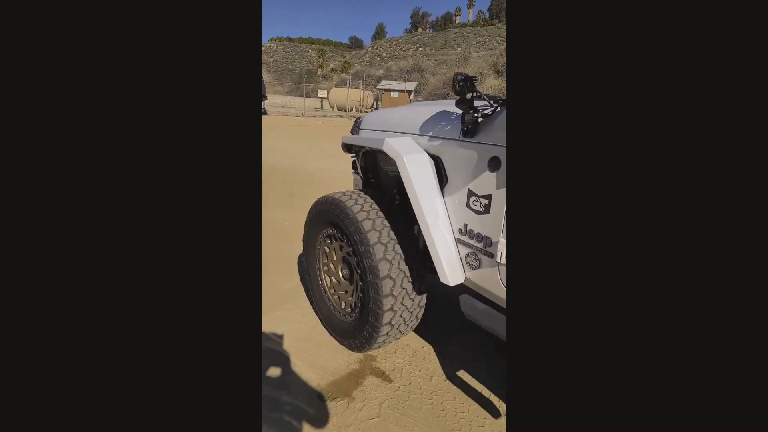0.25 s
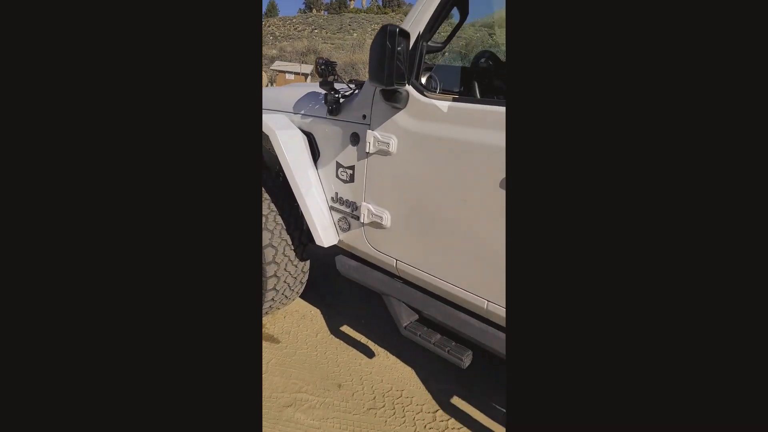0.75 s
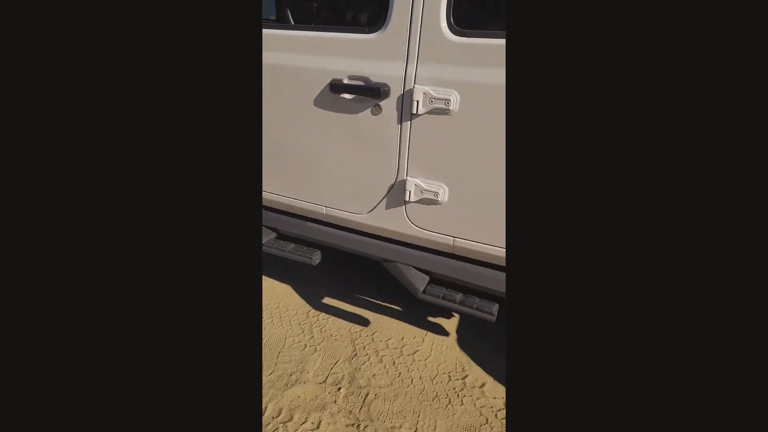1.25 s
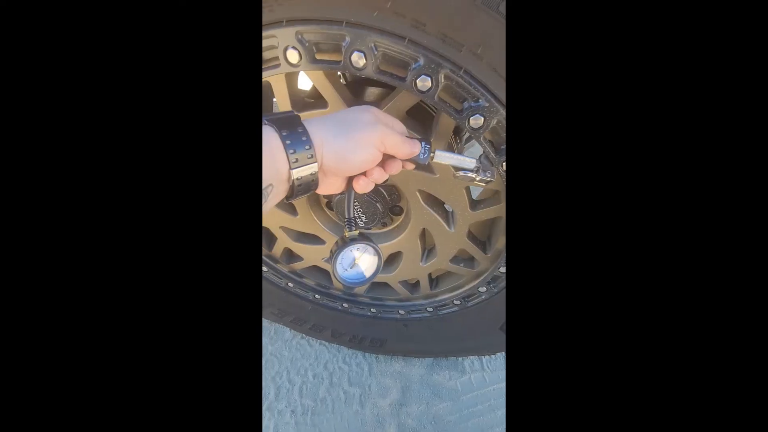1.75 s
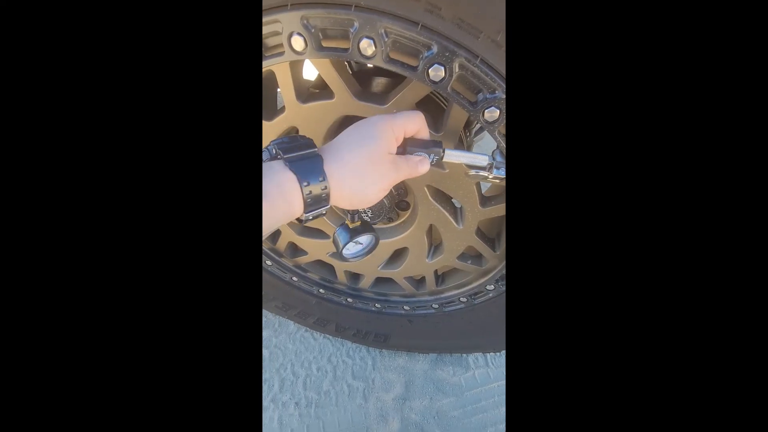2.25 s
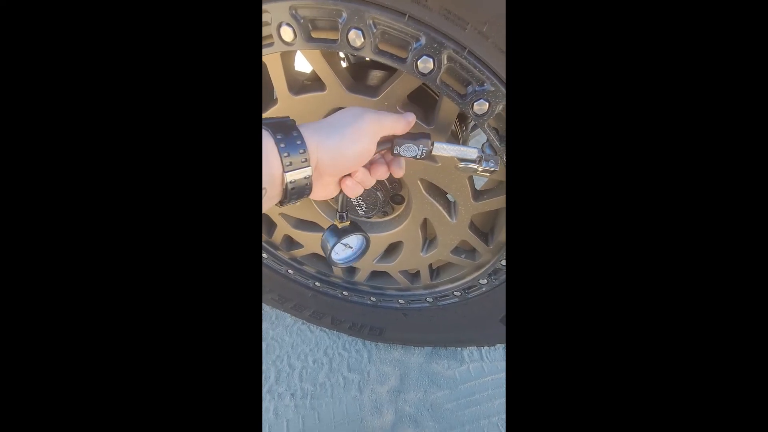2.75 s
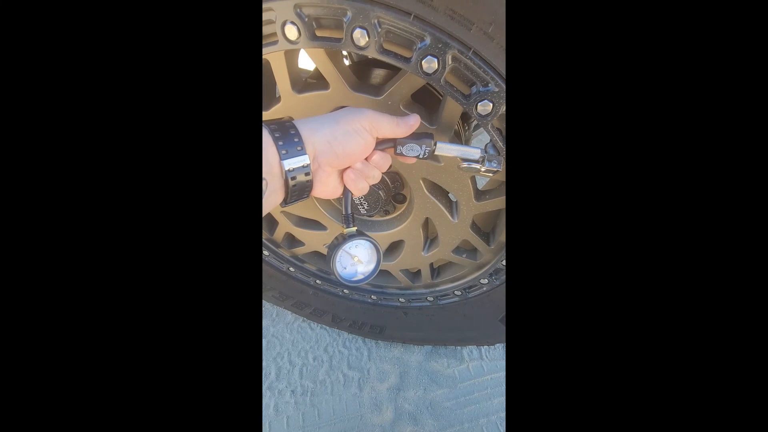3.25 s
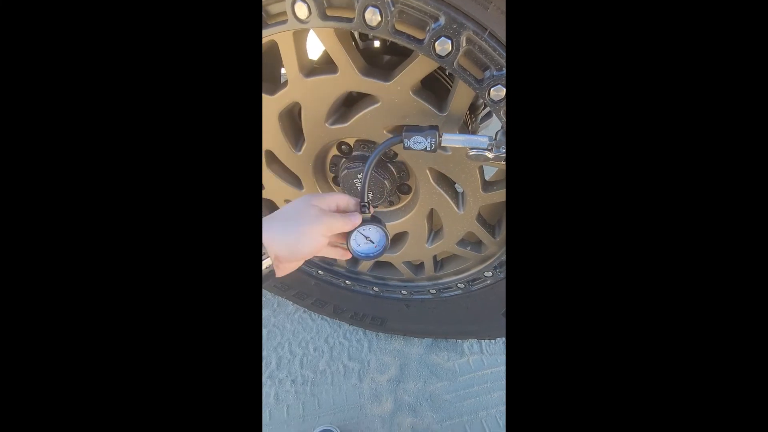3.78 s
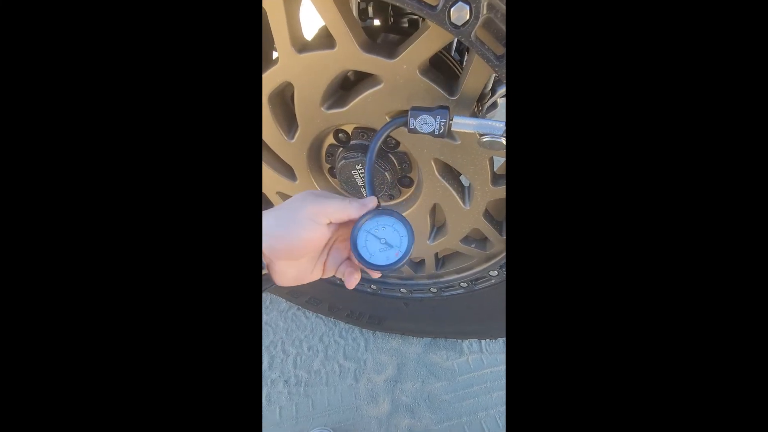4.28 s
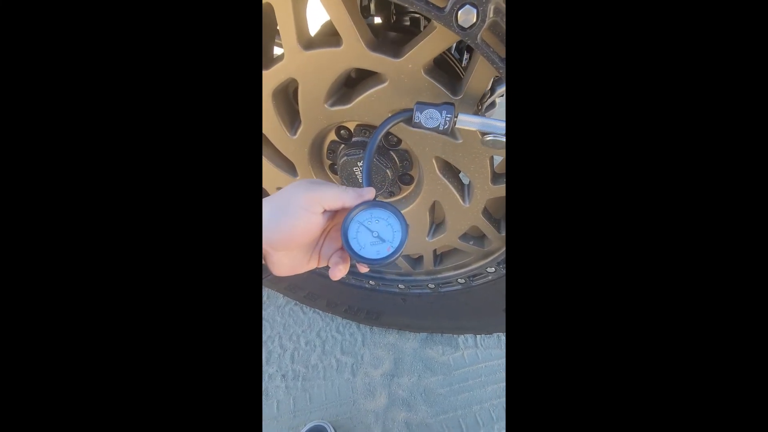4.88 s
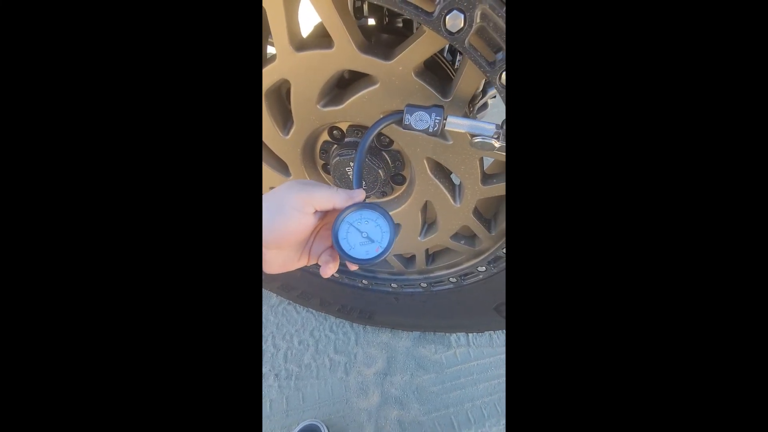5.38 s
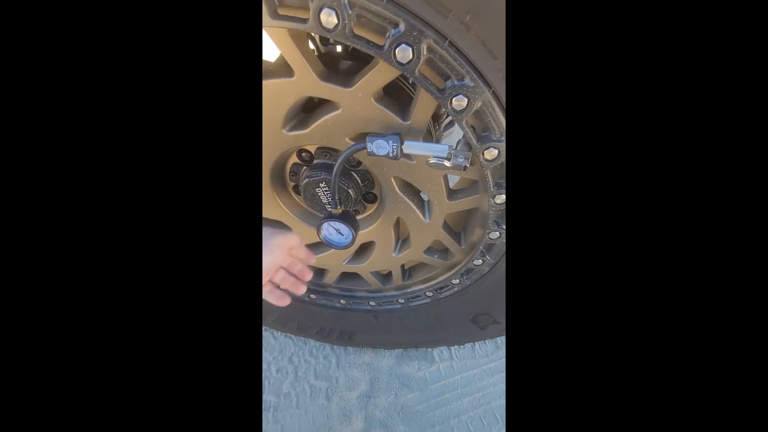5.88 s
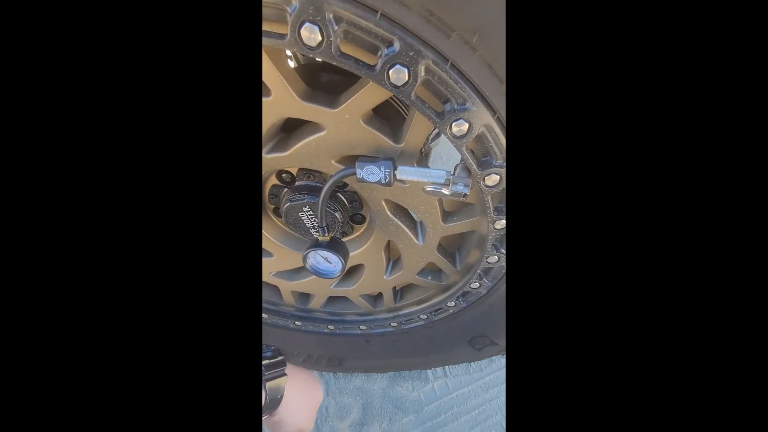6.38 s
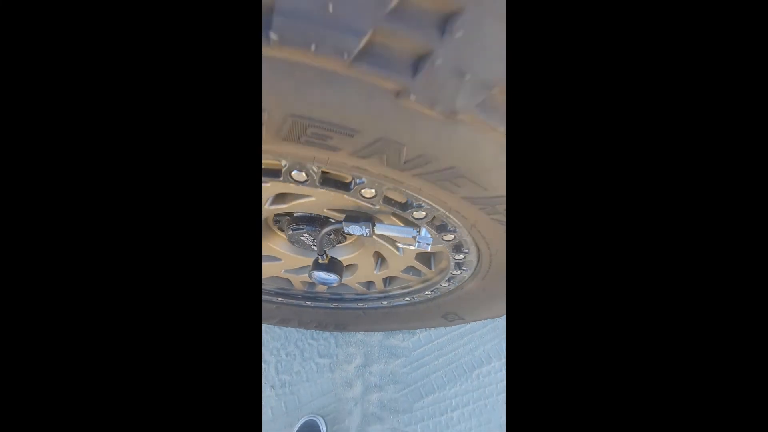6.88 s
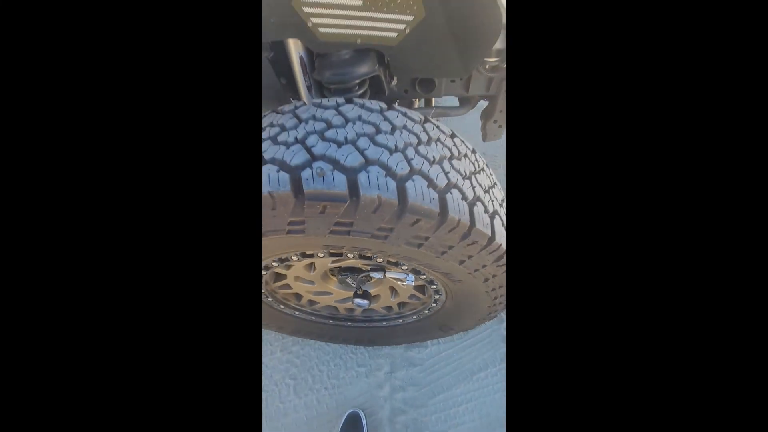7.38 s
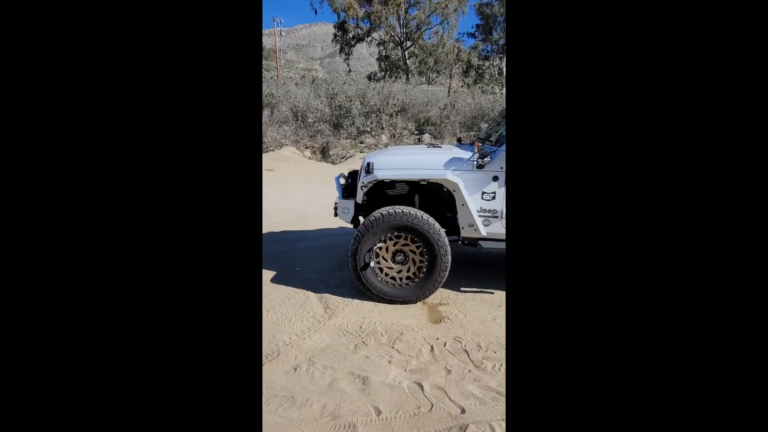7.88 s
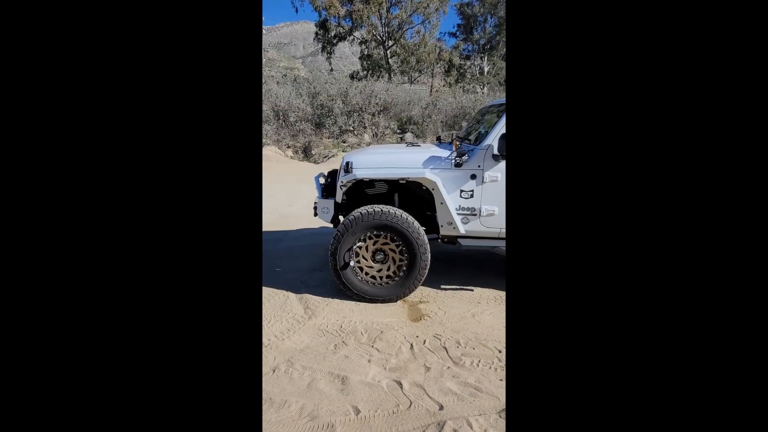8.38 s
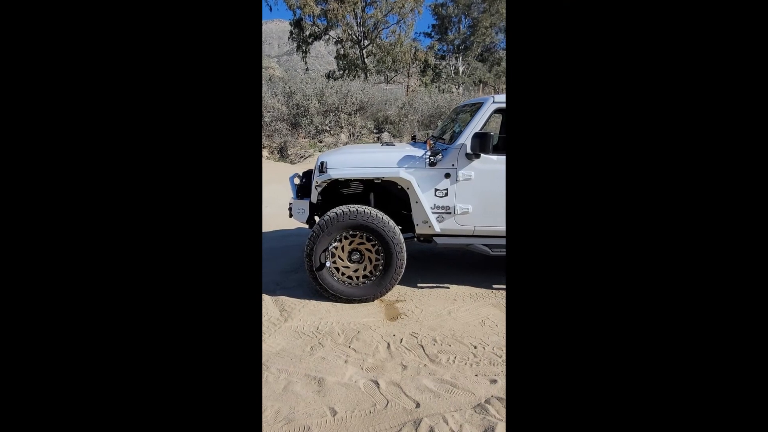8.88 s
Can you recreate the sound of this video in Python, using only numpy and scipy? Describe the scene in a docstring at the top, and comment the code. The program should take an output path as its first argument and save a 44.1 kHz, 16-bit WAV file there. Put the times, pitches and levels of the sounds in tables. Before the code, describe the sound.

A low, lumpy engine idle opens the scene, with a distant tyre hissing softly. The sound cuts to right beside the valve: a faint metallic clink, a quickly growing leak, then a strong rush of air that holds for several seconds over gusts of wind on the microphones. Finally the same hiss is heard from farther away, steady and soft, with light wind rumble. It is all outdoors, in head-like stereo.

```python
"""Air hisses from the valve of a large tyre outdoors: the escaping jet swirls, and that makes the noise.
Two microphones, one each side of a head, hear it from three spots with short gaps between them.
First from afar, beside an idling two-cylinder engine whose firings ring its exhaust pipe. Then close up,
as a hand opens the valve, a tool clinks and the listener steps back. Last from across the yard.
At the last two spots, wind buffets each microphone on its own."""
import sys
import numpy as np
from scipy import signal
from scipy.io import wavfile
from scipy.ndimage import uniform_filter1d

SR = 44100
rng = np.random.default_rng(int(sys.argv[2]) if len(sys.argv) > 2 else 0)


def put_to_file(sound):
    """Save the sound as 16-bit audio at rate SR, in the file named by the first command-line argument."""
    columns = np.atleast_2d(sound).T  # one column per channel
    safe = np.clip(columns, -1, 1)
    whole_steps = np.round(safe * 32767)
    wavfile.write(sys.argv[1], SR, whole_steps.astype(np.int16))


N = 403074


def amp(db):
    """Gain of a level in dB."""
    return 10 ** (np.asarray(db) / 20)


def evened(x):
    """Scales to rms 1."""
    return x / np.sqrt(np.mean(x ** 2) + 1e-20)


def read(points, hz):
    """Every column of a spectrum table, on a log-frequency axis."""
    f, *columns = np.transpose(points)
    return np.array([np.interp(np.log(hz + 1), np.log(f + 1), c) for c in columns])


def add(mix, s, sound):
    """Mixes a sound in at a time."""
    part = mix[:, max(round(s * SR), 0):][:, :sound.shape[1]]
    part += sound[:, :part.shape[1]]


def blotches(frames, bins, across, along):
    """Random field of rms 1, smooth over some bins and some frames."""
    field = rng.standard_normal((2, bins, frames))
    return evened(uniform_filter1d(uniform_filter1d(field, across, 1), along, 2))


def resonate(x, hz, width_hz):
    """A fixed resonance of gain 1."""
    return signal.lfilter(*signal.iirpeak(hz, hz / width_hz, SR), x)


# the idle speed, wandering a little: (time [s], speed [cycles a second])
IDLE_SPEED = [(0, 9.29), (.17, 10.6), (.56, 10.41), (.76, 11), (.86, 10.37), (1.24, 9.86), (1.4, 10.39),
              (1.6, 9.86)]

def firing_times(first_s=0.0378):
    """The first cylinder fires once in every engine cycle."""
    t = np.arange(first_s, IDLE_SPEED[-1][0], 1 / SR)
    cycles = np.cumsum(np.interp(t, *np.transpose(IDLE_SPEED))) / SR
    return np.interp(np.arange(16), cycles, t)


# notes of the exhaust pipe and bodywork: (pitch [Hz], relative level [dB], time to fade by 60 dB [s])
EXHAUST_NOTES = [(54.8, -12.5, 0.21), (78.3, -9.5, 0.14), (109.3, -19, 0.32), (238, -47, 0.051),
                 (388.4, -18, 0.23)]

def engine(lead_s=.1, second_share=.37, rasp_share=-0.07):
    """Two uneven firings a cycle ring the exhaust, along with gas roar, a whine, a rasp and clatter."""
    n = round(1.7 * SR)
    first = firing_times() + lead_s  # start early, so the cycle before is still ringing
    cycle_s = np.diff(first, append=2 * first[-1] - first[-2])
    first, cycle_s = np.r_[first[0] - cycle_s[0], first], np.r_[cycle_s[0], cycle_s]
    second = first + second_share * cycle_s
    chance = rng.standard_normal((len(first), 2))
    kicks = np.zeros(n)
    kicks[(first * SR).astype(int)] = amp(0.29 * chance[:, 0])
    kicks[(second * SR).astype(int)] = amp(-2.5 + 0.81 * chance[:, 1])
    blow = signal.windows.hann(round(0.0036 * SR))
    pulses = -signal.oaconvolve(kicks, blow / blow.sum(), "same")  # minus: suction comes first
    t = np.arange(SR // 2) / SR
    pipe = sum(amp(db - 60 * t / t60) * np.cos(2 * np.pi * hz * t) for hz, db, t60 in EXHAUST_NOTES)
    chug = signal.oaconvolve(pulses, pipe)[:n]
    gas = rng.standard_normal((2, n)) * 0.4 + rng.standard_normal(n)

    def gas_band(hz, width_hz):
        """The part of the gas noise near one pitch."""
        return evened(resonate(resonate(gas, hz, width_hz), hz, width_hz))

    roar = sum(amp(db) * gas_band(hz, 10 / t60) for hz, db, t60 in EXHAUST_NOTES)
    whine = gas_band(326.4, width_hz=14)
    cycles = np.interp(np.arange(n) / SR, first, np.arange(len(first)))
    swell = 1 + np.cos(2 * np.pi * (cycles - rasp_share))  # peaks just before the first cylinder fires
    rasp = gas_band(1600, width_hz=1000) * swell
    sound = chug + amp(-49.5) * rasp + amp(-18.5) * roar + amp([[-37], [-33]]) * whine
    sound += amp([[2], [6]]) * clatter(n, lead_s)
    return sound[:, round(lead_s * SR):]


# how the hiss at the left ear also reaches the right, one list a spot: (delay [ms], share)
EAR_PATHS = [
    [(.13, .3), (.71, .22)],
    [(-.02, -.16), (.06, -.2), (.58, .19), (.77, .13), (1.31, -.17)],
    [(-1.1, .12), (-.7, -.12), (-.01, .23), (.15, .12), (.63, .28), (1.32, .1)],
]

def hiss(moves, tone, spot, ripple_db, patchy_db, tone_change=None):
    """Swirling air makes noise; echoes off spokes and ground make some pitches louder than others."""
    s, level_db, treble_db, pan_db = np.transpose(moves)
    n = round((s[-1] - s[0]) * SR)
    frames, hz = n // 128 + 5, np.fft.rfftfreq(512, 1 / SR)
    t = s[0] + np.arange(frames) * 128 / SR
    treble_octaves = np.log2(np.maximum(hz / 3500, 1))[:, None]
    db = read(tone, hz)[:, :, None] + np.interp(t, s, treble_db) * treble_octaves
    db += 36 * np.log2(np.clip(hz / 450, .01, 1))[:, None]  # hardly any bass
    if tone_change:
        db += tone_change(t, hz)
    db += ripple_db * blotches(frames, 257, across=2, along=500)
    db += patchy_db * blotches(frames, 257, across=16, along=70)
    db += 2.47 * blotches(frames, 257, across=2, along=10)  # fine grain of the swirls
    a, b, c, d = rng.standard_normal((4, 257, frames))
    left, unrelated = a + 1j * b, c + 1j * d
    shared = sum(share * np.exp(-2j * np.pi * hz * ms / 1000) for ms, share in EAR_PATHS[spot])[:, None]
    right = shared * left + np.sqrt(np.clip(1 - abs(shared) ** 2, 0, 1)) * unrelated
    spectrum = np.array([left, right]) * amp(db)
    power = (abs(spectrum) ** 2).mean((0, 1))
    spectrum /= np.sqrt(uniform_filter1d(power, 60))  # changes of tone leave the level alone
    noise = evened(signal.istft(spectrum, nperseg=512, noverlap=384)[1][:, :n])
    t = s[0] + np.arange(n) / SR
    return s[0], noise * amp(np.interp(t, s, level_db) + np.outer([.5, -.5], np.interp(t, s, pan_db)))


# tone of the hiss beside the engine: (pitch [Hz], left [dB], right [dB])
FAR_TONE = [(554, -8, 3), (1030, -11.5, -12), (1780, -9.5, -3.5), (2400, -17, -13.5), (4270, -19.5, -16.5),
            (6050, -16.5, -9.5), (7740, -18.5, -20.5), (9100, -20, -10.5), (13500, -11, -9),
            (15700, -17, -17)]
# how it moves: (time [s], level [dB], treble tilt [dB an octave], left over right [dB])
FAR_MOVES = [(0, -38, -3, 5.5), (1.6, -35.5, -1.5, 3.5)]

def far_hiss():
    """The distant tyre's hiss blends with the whirr of the engine."""
    return hiss(FAR_MOVES, FAR_TONE, spot=0, ripple_db=1.2, patchy_db=1.6)


# ticks of the engine's valves, mostly in pairs: (time [s], relative level [dB])
VALVE_TICKS = [(0.1141, -32), (0.1356, -32), (0.3067, -30), (0.3316, -32), (0.403, -30), (0.4254, -32),
               (0.4963, -32), (0.5187, -34), (0.614, -31), (0.8824, -32), (0.9737, -32)]

def clatter(n, lead_s, snap_s=0.0047, rattle_s=0.022):
    """The engine's valve gear taps: each tick is a bright snap, then a softer rattle."""
    at, tick_db = np.transpose(VALVE_TICKS)
    taps = np.zeros(n)
    taps[((at + lead_s) * SR).astype(int)] = amp(tick_db)
    t = np.arange(2000) / SR
    fade = np.exp(-t / snap_s) + 0.46 * np.exp(-t / rattle_s)
    ticks = signal.oaconvolve(taps, fade)[:n] * rng.standard_normal((2, n))
    return sum(resonate(resonate(ticks, hz, 1200), hz, 1200) for hz in (5300, 6900))


# wind strength, one list for each of the last two spots: (time [s], left [dB], right [dB])
GUSTS = [
    [(1.58, -29, -30), (2.12, -35, -33.5), (2.32, -24, -18.5), (2.47, -31.5, -25.5), (2.73, -17.5, -13.5),
     (2.9, -26.5, -20), (3.18, -17.5, -20), (3.3, -33, -22), (3.83, -27, -20), (4.0, -12.5, -16.5),
     (4.15, -25, -25.5), (4.35, -18.5, -21.5), (4.85, -25.5, -23.5), (5.1, -21.5, -24), (5.5, -33, -25),
     (5.75, -24, -21.5), (6.1, -29.5, -28.5), (6.45, -26, -20.5), (7.0, -33, -23.5), (7.3, -28, -21),
     (7.76, -28, -20)],
    [(7.79, -38.5, -39), (8.1, -37.5, -39), (8.72, -41, -41.5), (8.82, -29.5, -36), (9.0, -38, -42),
     (9.14, -34, -38)],
]
# the wind's deep tone: (pitch [Hz], relative level [dB])
WIND_TONE = [(20, -31), (38, -4.5), (55, 5.5), (80, -0.5), (170, -11), (300, -21), (600, -33), (1300, -51),
             (6000, -96)]

def wind(gusts, upper_cut_s=(1.92, 2.2), upper_cut_db=-18):
    """Wind pushes on each microphone separately and makes a lumpy rumble."""
    s, *level_db = np.transpose(gusts)
    n = round((s[-1] - s[0]) * SR)
    frames, hz = n // 256 + 9, np.fft.rfftfreq(2048, 1 / SR)
    a, b = rng.standard_normal((2, 2, 1025, frames))
    lumps_db = 3.76 * blotches(frames, 1025, across=12, along=6) * np.clip(hz / 120, .3, 1.5)[:, None]
    t = s[0] + np.arange(frames) * 256 / SR
    # the rumble is briefly filtered above about 200 Hz as the loud hiss starts
    upper = np.clip(hz / 185 - 1, 0, .2) * 5
    cut = np.clip(np.minimum(t - upper_cut_s[0], upper_cut_s[1] - t) / .02, 0, 1)
    lumps_db += upper_cut_db * np.outer(upper, cut)
    spectrum = (a + 1j * b) * amp(read(WIND_TONE, hz)[0][:, None] + lumps_db)
    rumble = evened(signal.istft(spectrum, nperseg=2048, noverlap=1792)[1][:, :n])
    t = s[0] + np.arange(n) / SR
    return s[0], rumble * amp([np.interp(t, s, db) for db in level_db])


# tone of the hiss right by the valve: (pitch [Hz], left [dB], right [dB])
CLOSE_TONE = [(800, -6.5, -6), (1050, -17, -22), (1280, -9, -14), (1720, -7, -11), (1980, -9, -18),
              (2600, -6, -1), (2950, -7, -9), (3350, 0, -2), (3800, -4, -6), (4450, -2, 0), (7150, -2, -3),
              (8000, -7, -8), (9750, -9, -10), (11900, -2, -3), (12900, -1, -5), (14500, -1, -9),
              (15700, -6, -15)]
# the leak grows: (time [s], level [dB], treble tilt [dB an octave], left over right [dB])
LEAK_MOVES = [(1.62, -61, -17, -2), (1.72, -66, -16, 1), (1.79, -60.5, -6, 0), (1.845, -32, -1, 3),
              (1.912, -20.5, 1, -3)]

def first_leak():
    """The valve starts to open: a faint, dull leak turns loud and bright."""
    return hiss(LEAK_MOVES, CLOSE_TONE, spot=1, ripple_db=1, patchy_db=1)


# notes of the valve tool: (pitch [Hz], relative level [dB], time to fade by 60 dB [s])
TOOL_NOTES = [(666, -52, 0.15), (1954, -50, 0.12), (2260, -55, 0.13)]

def tool_clink():
    """The metal valve tool rings faintly, a little to the left."""
    t = np.arange(SR // 4) / SR
    ring = sum(amp(db - 60 * t / t60) * np.sin(2 * np.pi * hz * t) for hz, db, t60 in TOOL_NOTES)
    return ring * np.minimum(t / .006, 1) * amp([[2], [-3]])


OPEN_S = 1.913  # the valve snaps fully open
# the head sways beside the jet: (time [s], treble tilt [dB an octave], left over right [dB])
HEAD_SWAY = [(1.913, 4, 1.5), (2.3, 1.5, 0.5), (3.85, 2.5, 2), (4.6, 1.35, 1), (5.8, 1, -0.5),
             (7.1, 2.5, 2), (7.71, 4, -2)]

def jet(steady_db=-15, rush_db=5, rush_s=0.13, near_m=0.69, walk_at_s=7.19, walk_m_per_s=0.73):
    """Air rushes from the open valve, settles, then gets quieter as the listener backs away."""
    s, treble_db, pan_db = np.transpose(HEAD_SWAY)
    t = np.arange(OPEN_S, SPOTS[2][0], .02)
    metres = near_m + walk_m_per_s * np.maximum(t - walk_at_s, 0)
    level_db = steady_db + rush_db * np.exp(-(t - OPEN_S) / rush_s) - 20 * np.log10(metres / near_m)
    moves = np.transpose([t, level_db, np.interp(t, s, treble_db), np.interp(t, s, pan_db)])
    return hiss(moves, CLOSE_TONE, spot=1, ripple_db=.7, patchy_db=1.1, tone_change=jet_tone_change)


# tone of the hiss a step back from the valve: (pitch [Hz], left [dB], right [dB])
BACK_TONE = [(500, -7, -8), (1360, -11.5, -16.5), (1950, -7, 0.5), (3000, -7.5, -5), (5440, -10.5, -6.5),
             (6940, -8.5, -7.5), (9900, -13.5, -10.5), (13200, -7.5, -6), (15800, -7.5, -11)]
# a bright band that climbs: (time [s], left pitch [Hz], right pitch [Hz], boost [dB])
BRIGHT_BAND = [(5.9, 3900, 3900, 0), (6.6, 4100, 4100, 3), (6.8, 5300, 5300, 3), (7.15, 5500, 5400, 5),
               (7.5, 7700, 6900, 6), (7.7, 8300, 6000, 4)]
# a dip at the left ear, climbing as the ground echo shortens: (time [s], pitch [Hz], change [dB])
ECHO_DIP = [(6.95, 1050, 1), (7.2, 1250, -5), (7.6, 1950, -11)]

def jet_tone_change(t, hz, step_back_s=(6.7, 7.3), full_db=6.1, full_s=0.26):
    """The first rush is fuller in the middle pitches; later, stepping back shifts the tone."""
    def band(times, centre_hz, gain_db, width_hz):
        """A sliding boost or dip, in dB."""
        offset_hz = hz[:, None] - np.interp(t, times, centre_hz)
        return np.interp(t, times, gain_db) * np.exp(-(offset_hz / width_hz) ** 2)

    db = (read(BACK_TONE, hz) - read(CLOSE_TONE, hz))[:, :, None] * np.interp(t, step_back_s, [0, 1])
    middle = np.exp(-np.log2((hz + 1) / 1700) ** 2)
    db += full_db * np.outer(middle, np.exp(-(t - OPEN_S) / full_s))
    times, *ears_hz, boost_db = np.transpose(BRIGHT_BAND)
    for ear, centre_hz in enumerate(ears_hz):
        db[ear] += band(times, centre_hz, boost_db, width_hz=550)
    db[0] += band(*np.transpose(ECHO_DIP), width_hz=200)
    return db


# sudden bumps of wind: (time [s], peak level [dB], pitch [Hz], left over right [dB])
WIND_THUMPS = [(2.219, -22, 144, 10), (2.717, -8, 65.4, -5), (3.14, -21, 97.5, -1), (3.899, -16, 132, -10),
               (3.975, -16.5, 83.5, -25), (5.78, -15, 70, -2), (8.762, -38, 84, 20)]

def wind_thump(db, hz, pan_db, rise_s=0.0072):
    """A swirl of wind hits the microphones: a few waves of pressure, sinking in pitch."""
    t = np.arange(round(.09 * SR)) / SR
    push = np.sin(2 * np.pi * hz * (1.26 * t - 3.9 * t ** 2) + rng.uniform(0, 2 * np.pi, (2, 1)))
    swell = t / rise_s * np.exp(1 - t / rise_s)
    return push * swell * amp(db + np.array([[.5], [-.5]]) * pan_db)


# tone of the hiss across the yard: (pitch [Hz], left [dB], right [dB])
YARD_TONE = [(520, -24, -19), (950, -20, -24), (1700, -15, -9), (2150, -21, -11), (2840, -17, -8),
             (3400, -9, -8), (3960, -20, -23), (4130, -13, -9), (4310, -20, -9), (4650, -12, -10),
             (4930, -25, -21), (5250, -13, -17), (6300, -5, 1), (6950, -11, -10), (7600, -17, -8),
             (8600, -10, -6), (9300, -15, -5), (10500, -14, -5), (11000, -7, -5), (12100, -6, -7),
             (12900, -6, -1), (13500, -7, -11), (14100, -5, -6), (14750, -9, -19), (15250, -6, -15),
             (15700, -10, -18)]
# it barely moves: (time [s], level [dB], treble tilt [dB an octave], left over right [dB])
YARD_MOVES = [(7.79, -30.5, 0.5, 0.5), (9.14, -30.5, 0, 0)]

def yard_hiss():
    """The open valve blows steadily, quieter from across the yard."""
    return hiss(YARD_MOVES, YARD_TONE, spot=2, ripple_db=.7, patchy_db=.3)


# when each listening spot is heard: (start [s], end [s], fade-in [s])
SPOTS = [(0, 1.549, 0.0013), (1.617, 7.704, 0.039), (7.794, 9.2, 0.014)]

def scene():
    """Adds up the engine, the tyre's hiss, the tool and the wind."""
    mix = np.zeros((2, N))
    add(mix, 0, engine()[:, :round(SPOTS[1][0] * SR)])
    for air in (far_hiss, first_leak, jet, yard_hiss):
        add(mix, *air())
    add(mix, 1.63, tool_clink())
    for gusts in GUSTS:
        add(mix, *wind(gusts))
    for s, db, hz, pan_db in WIND_THUMPS:
        add(mix, s, wind_thump(db, hz, pan_db))
    return mix


def record(dry, shadow_hz=8000, half_width_hz=400, depth_db=16, top_hz=15790):
    """The head shades the right ear, gaps part the spots, and the lowest and highest pitches are cut."""
    hz, t = np.linspace(0, SR / 2, 512), np.arange(N) / SR
    shadow_gain = amp(-depth_db / (1 + ((hz - shadow_hz) / half_width_hz) ** 2))
    shaded = signal.oaconvolve(dry[1], signal.firwin2(511, hz, shadow_gain, fs=SR), "same")
    right = np.where(t < SPOTS[1][0], dry[1], shaded)  # faces away from the valve after the first spot
    ears = signal.sosfiltfilt(signal.butter(2, 30, "high", fs=SR, output="sos"), [dry[0], right])
    heard = np.zeros(N)
    for start, end, fade_s in SPOTS:
        fade_out = np.where(t < end, 1, 0.32 * np.exp(-abs(t - end) / 0.0077))
        heard += np.clip((t - start) / fade_s, 0, 1) * fade_out
    treble_cut = signal.firwin(767, top_hz, window=("kaiser", 10), fs=SR)
    return signal.oaconvolve(np.clip(ears * heard, -.85, .85), treble_cut[None], "same")


dry = scene()
out = record(dry)
put_to_file(out)
```